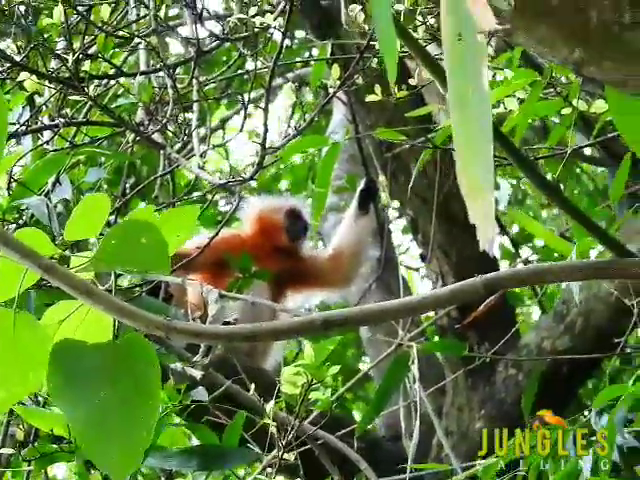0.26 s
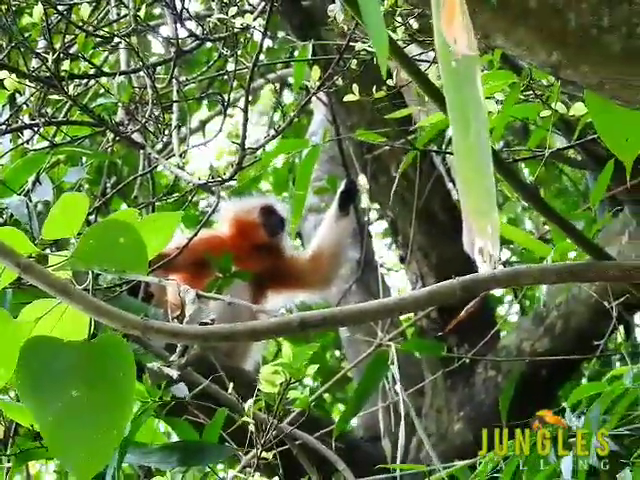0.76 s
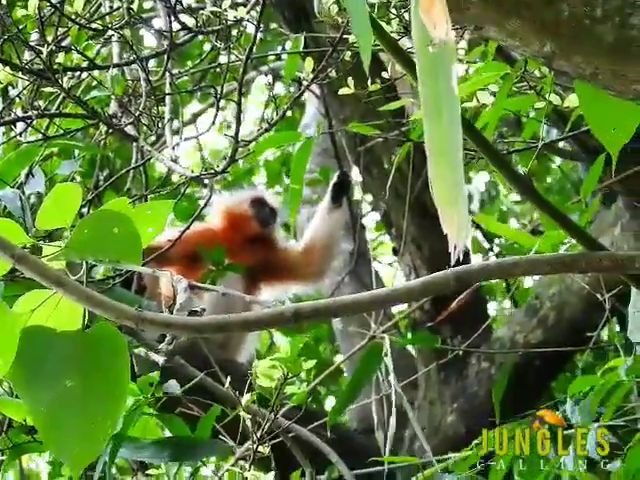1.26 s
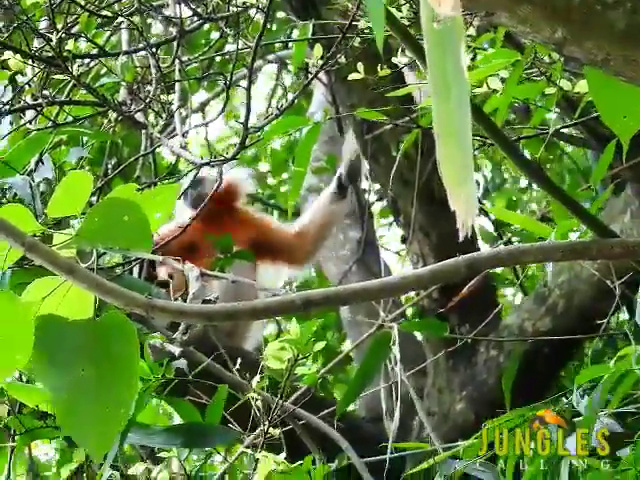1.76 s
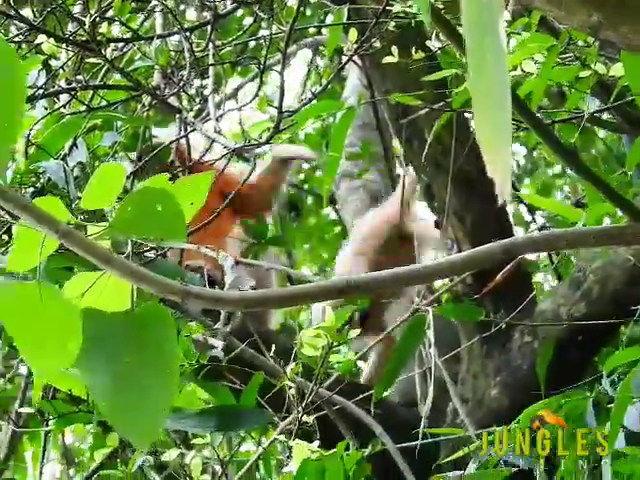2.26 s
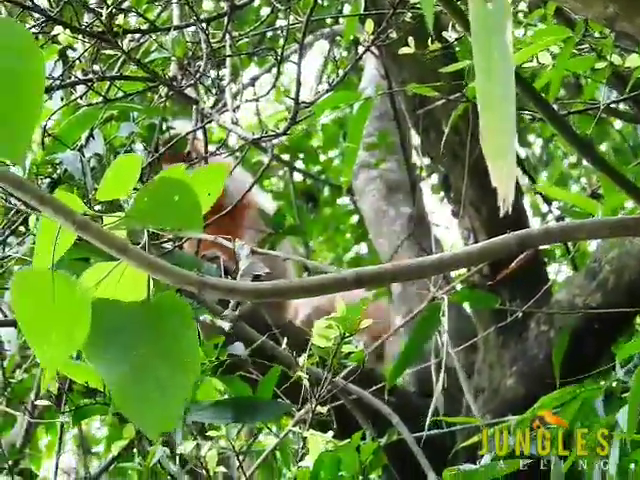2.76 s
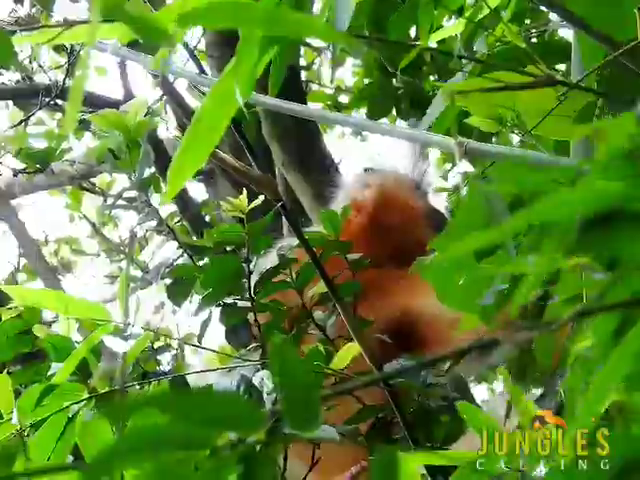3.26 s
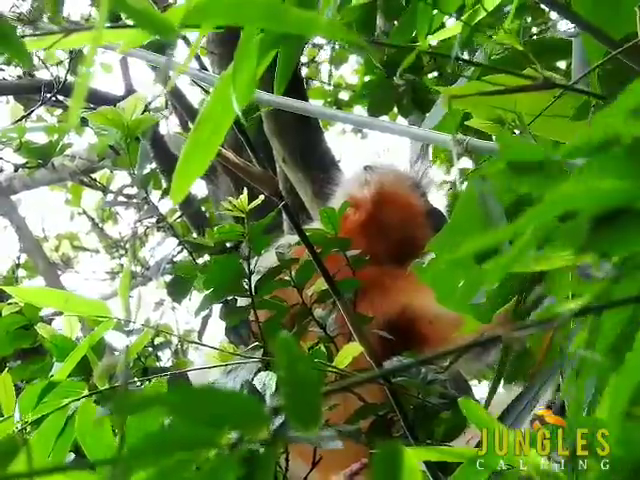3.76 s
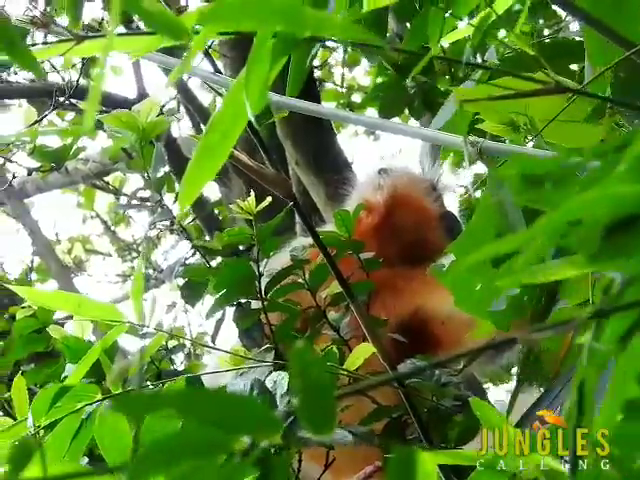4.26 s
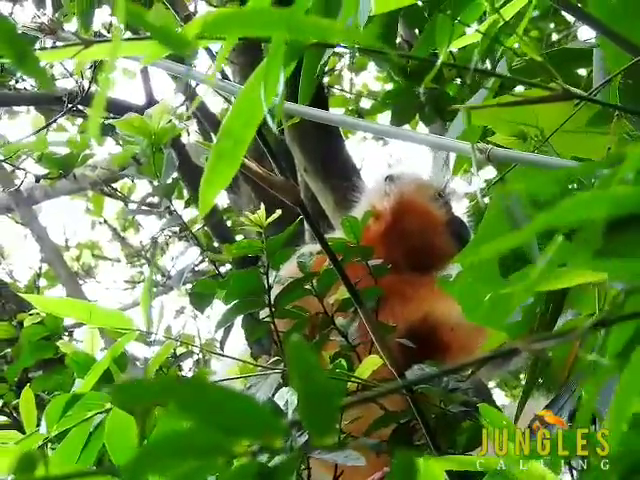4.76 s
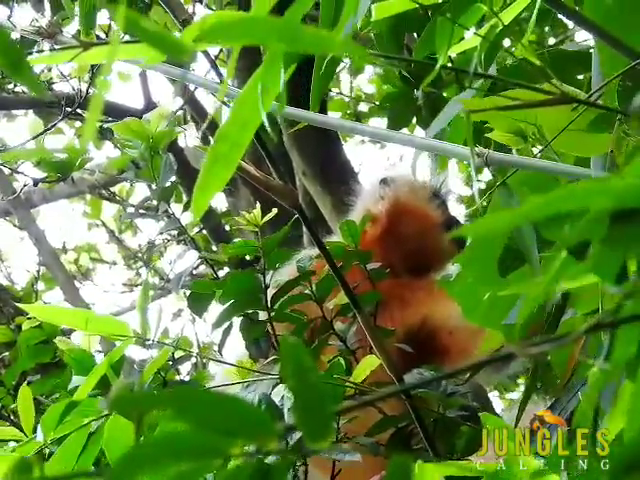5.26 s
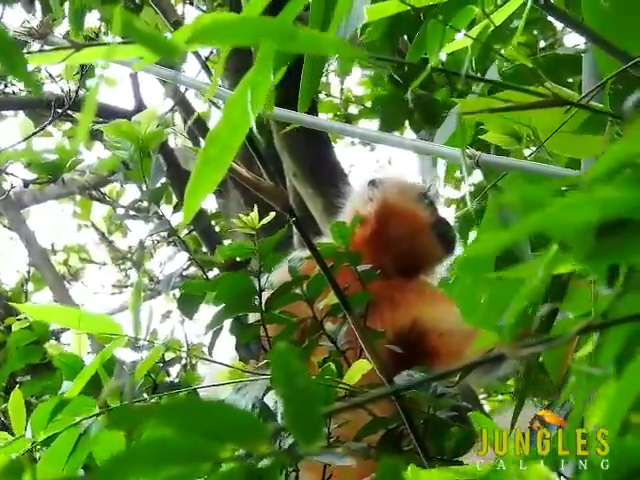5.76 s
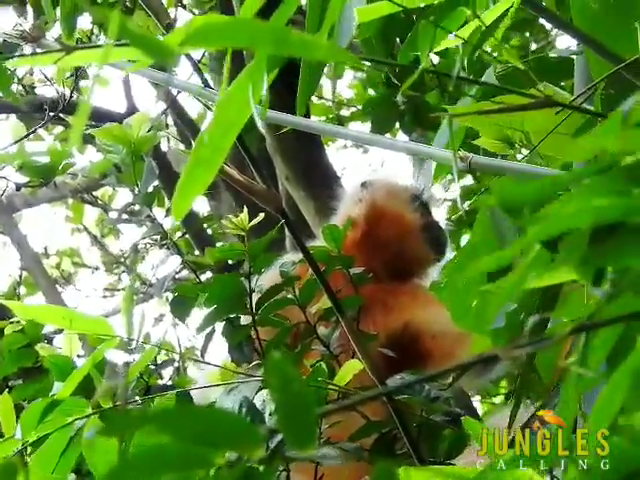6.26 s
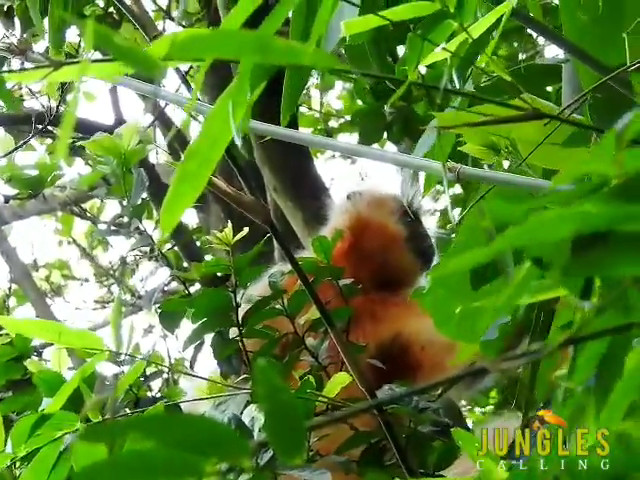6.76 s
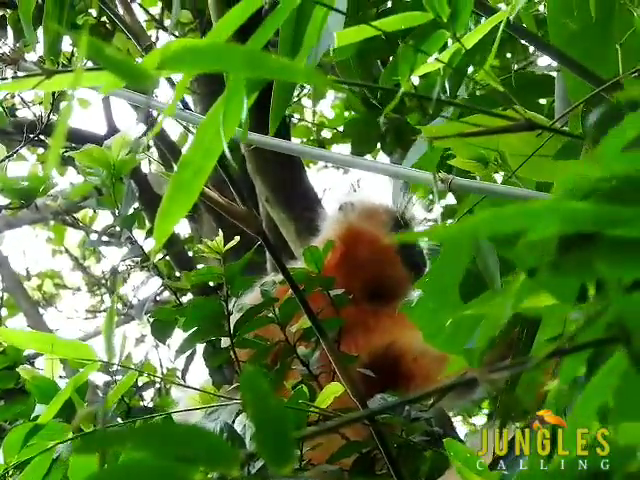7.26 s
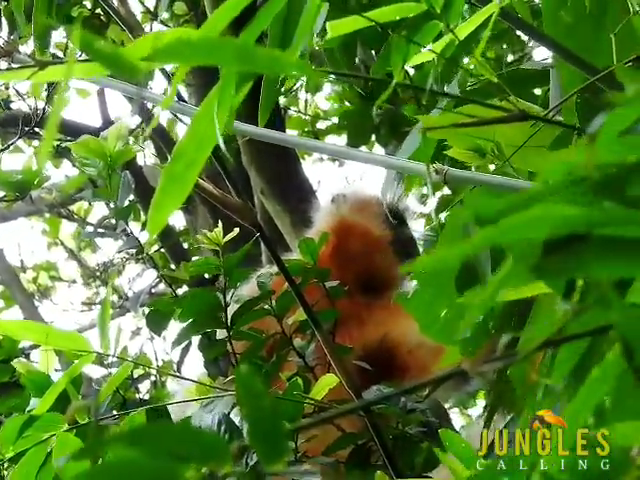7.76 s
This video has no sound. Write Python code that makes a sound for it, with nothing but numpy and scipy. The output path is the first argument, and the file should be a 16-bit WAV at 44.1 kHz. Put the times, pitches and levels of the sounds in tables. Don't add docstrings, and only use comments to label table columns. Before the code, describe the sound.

In a tropical forest by day, leaves rush softly and cicadas drone high and steady. A bird soon starts one hollow, near-pure note about twice a second, lightly echoed by trunks, and keeps on to the end. Faint chirps scatter behind, a nearer bird squeaks three times, and late a brief falling whistle comes from the right. The microphone stays central and still.

```python
import sys
import numpy as np
from scipy import signal
from scipy.fft import rfft, irfft, next_fast_len
from scipy.io import wavfile
from scipy.ndimage import uniform_filter1d

SR = 44100
rng = np.random.default_rng(int(sys.argv[2]) if len(sys.argv) > 2 else 0)


def dump_mix(stems):
    frames = np.atleast_2d(stems).T
    limited = np.clip(frames, -1, 1)
    pcm = np.round(limited * 32767).astype(np.int16)
    wavfile.write(sys.argv[1], SR, pcm)


def linear_from_db(decibels):
    return 10 ** (np.asarray(decibels, float) / 20)


N = 353682
TIME = np.arange(N) / SR

# frequency_hz, density_db (per Hz)
CANOPY_SPECTRUM = [(20, -5), (69, 0), (329, -2), (582, -6.5), (754, -9), (1140, -12.5), (2200, -16),
                   (3900, -19), (5350, -25), (5600, -34.5), (6120, -33), (6300, -23), (8630, -23.5),
                   (9900, -28.5)]
CANOPY_DB, LEAVES_T60_S = -38, 0.6994

# mode_hz, width_hz, level_db
TYMBAL_MODES = [
    (4852.6, 294, -1),
    (4485.7, 396, -4.5),
    (5162, 268.2, -8),
]
# time_s, level_db
CHORUS_SWELL = [(0.0, -42.5), (0.71, -43.5), (1.16, -44.5), (1.65, -44.5), (1.96, -42), (2.35, -42),
                (2.79, -40.5), (3.1, -42.5), (4.02, -41.5), (4.33, -43.5), (4.6, -42.5), (5.02, -44),
                (5.76, -42), (7.77, -44.5), (8.02, -44)]
# peak_s, level_db, die_s (time to fall by 20 dB
THIN_BAND_BURSTS = [(.09, -49, 0.3441), (.29, -50, 0.2223), (1.87, -45, 0.49), (2.5, -59.5, 0.54),
                    (2.93, -45, 0.45), (3.12, -49.5, 0.26), (3.32, -46, 0.47), (4.04, -55, 0.42),
                    (4.15, -39, 0.11), (4.44, -57, -0.48), (4.74, -43, .5), (5.3, -45.5, 0.44),
                    (6.0, -55.5, 0.1), (6.23, -48.5, 0.54), (7.3, -50, 0.03), (7.46, -46.5, 0.45)]
THIN_BAND_RISE, THIN_BAND_REST_DB = .5, -69

# start_s, length_s, from_hz, to_hz, level_db
HIGH_CALLS = [ (.904, .12, 8360, 7590, -53.5), (1.004, .1, 7151, 8056, -52), (1.098, .37, 7864, 7207, -55),
              (1.893, .04, 6340, 7030, -30), (1.923, 0.092, 7237, 6867, -32.5),
              (2.095, 0.05, 7066, 5806, -37.5), (2.475, 0.035, 5897, 7296, -31.5),
              (2.797, 0.036, 5845, 7810, -38), (4.2, .5, 7930, 7663, -49), (4.318, .16, 6500, 5950, -47),
              (4.589, .2, 7444, 6770, -49), (4.68, .24, 6917, 5560, -46.5), (6.15, .053, 9000, 7740, -42.5),
              (6.175, .025, 8840, 7100, -28), (6.185, 0.023, 7300, 5764, -32.5),
              (6.318, .097, 7960, 7730, -46)]
# start_s, from_hz, to_hz, level_db
FLICKS = [ (.365, 2884, 3568, -37), (.172, 3272, 3430, -39.5), (1.13, 2426, 2972, -45),
          (2.38, 3300, 3745, -43), (2.554, 3230, 4478, -40), (2.685, 2995, 4596, -37.5),
          (3.048, 2898, 4344, -41.5), (3.195, 2856, 4245, -42), (3.477, 2161, 3628, -40.5),
          (5.19, 2697, 2997, -42.5), (5.22, 3032, 3618, -37.5), (5.738, 1780, 3148, -43.5),
          (7.945, 3114, 3700, -44)]
FLICK_S = .034
# start_s, length_s, from_hz, to_hz, level_db
PIPINGS = [ (.062, 0.043, 5945, 5860, -48.5), (.272, 0.048, 5900, 5837, -51.5),
           (1.592, 0.024, 1574, 1544, -41.5), (2.104, 0.0172, 2306, 3645, -36),
           (2.116, .016, 3855, 2311, -37), (2.455, 0.0386, 5200, 5330, -36.5),
           (3.568, 0.0706, 2260, 2270, -47.5), (3.61, 0.065, 3468, 2930, -44.5),
           (3.661, 0.055, 2959, 2924, -36.5), (3.819, 0.01859, 2172, 2846, -45),
           (3.83, 0.035, 2890, 3150, -41.5), (3.858, .039, 3120, 2584, -41.5),
           (4.514, 0.0305, 1498, 1637, -41.5), (4.546, .059, 5242, 5700, -40.5),
           (4.63, 0.0746, 1586, 1922, -43), (4.683, .043, 1844, 2025, -37.5),
           (4.71, .06, 2000, 2682, -43.5), (5.29, 0.045, 1993, 2620, -41.5),
           (5.656, 0.0285, 1418, 1306, -41), (2.815, .03, 4380, 4246, -41),
           (6.135, 0.03284, 2957, 2686, -45), (6.627, 0.054, 1739, 1890, -44.5)]
# start_s, length_s, from_hz, to_hz, level_db
WARBLES = [ (3.09, .06, 2200, 3150, -44), (.183, .23, 2340, 2966, -43.5), (1.623, .039, 2980, 2950, -42),
           (1.761, .04, 4550, 4900, -34), (1.86, .055, 2765, 2650, -33), (1.915, 0.16, 3000, 2980, -48.5),
           (2.182, .08, 4300, 4250, -46.5), (3.245, .06, 4130, 4323, -41), (2.08, .023, 2050, 3590, -31),
           (2.79, .022, 2100, 5000, -29), (2.894, .061, 2580, 4630, -39), (4.614, .075, 2150, 3920, -42),
           (1.8, .22, 2640, 2446, -50), (2, .075, 3300, 4500, -50.5), (1.8, .09, 2650, 3100, -38),
           (3.902, .093, 2306, 2511, -46.5), (4.5, 0.14, 3900, 3400, -48.5),
           (5.203, .12, 1630, 2002, -43.5), (5.296, .06, 3814, 4150, -42)]
HIGH_BLUR, FLICK_BLUR, PIPING_BLUR, WARBLE_BLUR = 0.839, 0.558, .3, 0.875

# start_s, peak_db, pitch_hz, scoop_hz (upward)
BARBET_NOTES = [(0.3456, -20.5, 665.8, -5.5), (0.8603, -16.5, 675.9, 10.5), (1.3814, -15, 675.5, 15),
                (1.931, -12, 672.3, 21.5), (2.437, -12, 669.8, 21), (2.9235, -12.0, 672.9, 18.5),
                (3.407, -11.5, 668, 23.5), (3.9062, -11.5, 665.6, 22), (4.3908, -11.5, 666.7, 14.5),
                (4.8914, -11, 661.4, 27), (5.37, -11.5, 662.3, 32), (5.88, -12, 669.3, 38),
                (6.3723, -12, 661.2, 23), (6.8626, -11.5, 651.5, 26.5), (7.3515, -11.5, 651.1, 28),
                (7.8717, -13, 650.6, 23)]
NOTE_SHAPE = [(-.04, 0, .7), (.1, .6, .6), (.2, .75, 0), (.4, .94, 0), (.6, .97, .5), (.8, .76, 1),
              (.9, .52, 1.2), (1.05, 0, 1.4)]
# multiple (of the pitch), level_db
NOTE_OVERTONES = [(1, 0), (2, -34), (3, -37), (4, -38.5), (5, -40)]
# delay_s, gain (negative when the wave comes back turned over)
TRUNK_ECHOES = [(.0321, .06), (.05, -.1), (.0676, -.14), (.0874, .06), (.1263, .04), (.1543, -.05),
                (.1694, -.03), (.2083, .04), (.2426, .02)]
FULL_DB, NOTE_S, NOTE_S_PER_DB = -12, 0.06304, 0.0019

# start_s, length_s, top_hz, level_db, lag (of the arch: under 1 climbs sooner)
SQUEAKS = [
    (1.677, 0.2049, 907.4, -26, 0.9955),
    (3.999, .196, 923.2, -25.5, .84),
    (7.272, .21, 907.9, -26.5, 1.01),
]
ARCH = [(0, .682), (.158, .905), (.28, 0.96), (.48, 1), (.825, .932), (.905, .85), (1, .68)]
# frequency_hz, gain_db
THROAT = [(900, -24), (1800, -11.5), (2200, -4), (2650, -3.5), (3050, -11.5), (3400, -6), (3700, 3),
          (4080, 1), (4480, -25.5), (5250, -13.5), (6000, -18), (7200, -16), (9000, -30), (10000, -22.5)]
SQUEAK_ATTACK_S, SQUEAK_RELEASE_S, SQUEAK_EDGE_DB = 0.0477, 0.0294, -11
RASP = .3

# start_s, length_s, from_hz, to_hz, level_db
WHISTLES = [
    (5.885, 0.058, 1080, 945, -45),
    (6.081, .113, 1576, 1289, -23),
    (6.211, 0.03943, 1105, 1190, -39),
    (6.24, .04, 1190, 1118, -41.5),
]
WHISTLE_HOLD, WHISTLE_DB_PER_OCTAVE = 0.576, 50.5
WHISTLE_SETTLE, WHISTLE_START_SHARP, WHISTLE_START_DB = 0.188, 0.0476, -25

HUM_FROM_S, HUM_HZ, HUM_DB = 6.65, 1910, -56.5

MASK_DB, MASK_REACH_HZ, MASK_FROM_HZ, MASK_LEAK = -24.5, 500, 4200, .4
TOP_HZ = 9975


def level(x, db):
    return x * linear_from_db(db) / np.sqrt(np.mean(x ** 2))


def colour(table, hz):
    table_hz, db = np.transpose(table)
    return linear_from_db(np.interp(np.log(np.maximum(hz, 1)), np.log(table_hz), db))


def ring(x, hz, width_hz):
    b, a = signal.iirpeak(hz, hz / width_hz, fs=SR)
    return signal.lfilter(b, a, signal.lfilter(b, a, x))


def walk(rate, size=N):
    hold = int(SR / rate)
    steps = np.repeat(rng.standard_normal(size // hold + 1), hold)
    return 1.2 * uniform_filter1d(steps, hold)[:size]


def sing(s, hz, gain, overtones, slew_s=0.0014):
    first = int(s[0] * SR)
    t = np.arange(first, int(s[-1] * SR)) / SR
    pitch = uniform_filter1d(np.interp(t, s, hz), 1 + int(slew_s * SR), mode="nearest")
    phase = 2 * np.pi * np.cumsum(pitch) / SR
    tone = sum(g(k * pitch) * np.sin(k * phase + k * k) for k, g in overtones)
    return first, np.interp(t, s, gain) * tone


def add(track, start, sound):
    track[start:start + len(sound)] += sound[:N - start]


def leaves(x, t60, rise_s=0.0032):
    t = np.arange(SR) / SR
    envelope = (1 - np.exp(-t / rise_s)) * np.exp(-np.log(1000) * t / t60)
    tail = rng.standard_normal(SR) * envelope
    return signal.fftconvolve(x, tail / np.sqrt(np.sum(tail ** 2)))[:N]


def canopy():
    size = next_fast_len(N)
    hz = np.fft.rfftfreq(size, 1 / SR)
    rush = rfft(rng.standard_normal(size)) * colour(CANOPY_SPECTRUM, hz)
    octave = np.log2(np.maximum(hz, 1) / 20)
    swell = walk(0.992)
    out = np.zeros(N)
    for k in range(11):
        band = irfft(rush * np.clip(1 - np.abs(octave - k), 0, 1), size)[:N]
        out += band * linear_from_db(.3 * swell + .7 * walk(5))
    return level(out, CANOPY_DB)


def insects():
    clicks = rng.standard_normal(N) * (rng.random(N) < .3) * linear_from_db(0.94 * walk(40))
    drone = np.zeros(N)
    for k, (hz, width_hz, db) in enumerate(TYMBAL_MODES):
        drone += level(ring(np.roll(clicks, 999 * k), hz, width_hz), db)
    drone = level(drone, .3) * linear_from_db(np.interp(TIME, *np.transpose(CHORUS_SWELL)))

    grains = rng.standard_normal(N) * (rng.random(N) < .2) * linear_from_db(2.8 * walk(30))
    thin = level(ring(grains, 5720, 320), 0)
    bursts = []
    for s, db, die_s in THIN_BAND_BURSTS:
        fall = (TIME - s) / die_s
        rise = (s - TIME) / (THIN_BAND_RISE * die_s)
        bursts.append(db - 20 * np.maximum(fall, rise))
    burst_db = np.max(bursts, axis=0).clip(THIN_BAND_REST_DB)
    return drone + thin * linear_from_db(burst_db - 2.0)


def far_birds():
    clear, blurred = np.zeros(N), np.zeros(N)
    flutter = walk(700)
    flicks = [(s, FLICK_S, hz0, hz1, db) for s, hz0, hz1, db in FLICKS]
    flocks = ((HIGH_CALLS, HIGH_BLUR), (flicks, FLICK_BLUR), (PIPINGS, PIPING_BLUR), (WARBLES, WARBLE_BLUR))
    for calls, blur in flocks:
        for s, length, hz0, hz1, db in calls:
            times = np.array([s, s + length])
            start, tone = sing(times, [hz0, hz1], [1, 1], [(0.99, np.ones_like)])
            tone = np.sqrt(2) * linear_from_db(db) * tone * signal.windows.tukey(len(tone), .5)
            tone = tone * (1 - blur ** 2 + blur ** 2 * flutter[start:start + len(tone)])
            add(clear, start, np.sqrt(1 - blur) * tone)
            add(blurred, start, np.sqrt(blur) * tone)
    return clear + leaves(blurred, LEAVES_T60_S, rise_s=0.0075)


def barbet():
    out = np.zeros(N)
    share, gain, rise = np.transpose(NOTE_SHAPE)
    partials = [(k, lambda f, d=d: linear_from_db(d)) for k, d in NOTE_OVERTONES]
    for s, db, hz, scoop_hz in BARBET_NOTES:
        length = NOTE_S + NOTE_S_PER_DB * (db - FULL_DB)
        add(out, *sing(s + length * share, hz + rise * scoop_hz, linear_from_db(db) * gain, partials))
    echoes = sum(g * np.pad(out, (int(s * SR), 0))[:N] for s, g in TRUNK_ECHOES)
    return out + echoes + linear_from_db(-20.0) * leaves(out, 1.6, rise_s=0.059)


def squeaker():
    out = np.zeros(N)
    share = np.linspace(0, 1, num=40)
    throat_gain = lambda f: colour(THROAT, f)
    for s, length, hz, db, lag in SQUEAKS:
        arch = np.interp(share ** lag, *np.transpose(ARCH))
        t = share * length
        edge = np.maximum(1 - t / SQUEAK_ATTACK_S, 1 - (length - t) / SQUEAK_RELEASE_S).clip(0)
        gain = linear_from_db(db + SQUEAK_EDGE_DB * edge)
        for k in range(1, 16):
            start, tone = sing(s + t, hz * arch, gain, [(k, throat_gain)], slew_s=.018)
            wink = linear_from_db((0.12 + 0.462 * k) * walk(74.2, size=len(tone)))
            rasp = 0.18 + RASP * np.linspace(0, 1, len(tone)) ** 6
            breath = 1 + rasp * rng.standard_normal(len(tone))
            add(out, start, tone * wink * breath * signal.windows.tukey(len(tone), .08))
    return out + linear_from_db(-9.5) * leaves(out, 0.616)


def whistler():
    out = np.zeros(N)
    partials = [(1, np.ones_like), (2, lambda f: linear_from_db(-31.5))]
    for s, length, hz0, hz1, db in WHISTLES:
        t = s + length * np.array([0, WHISTLE_SETTLE, WHISTLE_HOLD, 1])
        end_db = db + WHISTLE_DB_PER_OCTAVE * min(np.log2(hz1 / hz0), 0)
        pitch = [hz0 * (1 + WHISTLE_START_SHARP), hz0, hz0, hz1]
        gain = linear_from_db([db + WHISTLE_START_DB, db - 2.5, db, end_db])
        start, tone = sing(t, pitch, gain, partials, slew_s=.008)
        add(out, start, tone * signal.windows.tukey(len(tone), .3))
    tails = np.array([leaves(out, 0.39), leaves(out, 0.4)])
    return out * linear_from_db([[-2.2], [2.2]]) + linear_from_db(-13.0) * tails


def hum():
    tone = level(ring(rng.standard_normal(N), HUM_HZ, 45.0), HUM_DB)
    return tone * np.clip((TIME - HUM_FROM_S) / .06, 0, 1)


def scene():
    return canopy() + insects() + far_birds() + barbet() + squeaker() + whistler() + hum()


def dim_treble(x):
    hz, _, cells = signal.stft(x, SR, nperseg=1024)
    power = np.mean(np.abs(cells) ** 2, axis=0) + 1e-18
    loud = uniform_filter1d(power, size=5, axis=1) * (hz[:, None] > MASK_FROM_HZ)
    fade = np.exp(-hz[1] / MASK_REACH_HZ)
    mask = linear_from_db(2 * MASK_DB) * signal.lfilter([0, 1], [1, -fade], loud, axis=0)
    kept = MASK_LEAK + (1 - MASK_LEAK) * power ** 2 / (power ** 2 + mask ** 2)
    return signal.istft(cells * kept, SR, nperseg=1024)[1][:, :N]


def roll_off(x):
    return signal.sosfilt(signal.butter(12, 9970, fs=SR, output="sos"), x)


def record(dry):
    lowpass = signal.ellip(12, .2, 60, TOP_HZ, fs=SR, output="sos")
    mix = signal.sosfilt(lowpass, dim_treble(dry))
    return roll_off(mix)


dry = scene()
out = record(dry)
dump_mix(out)
```